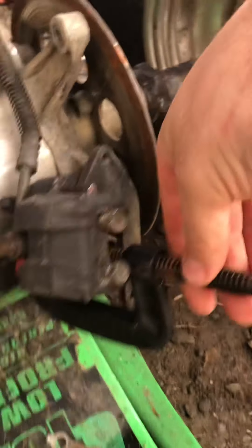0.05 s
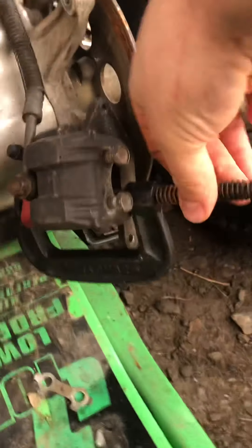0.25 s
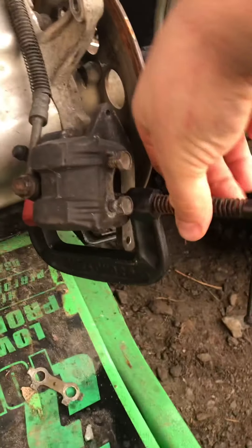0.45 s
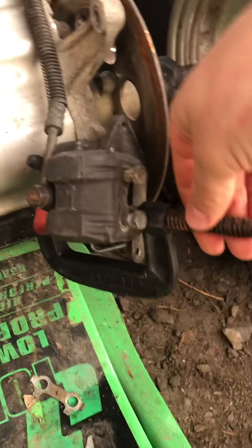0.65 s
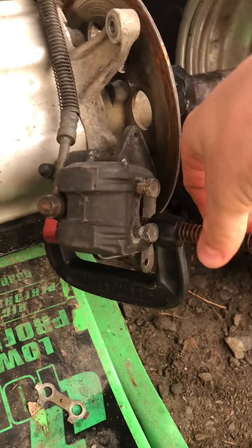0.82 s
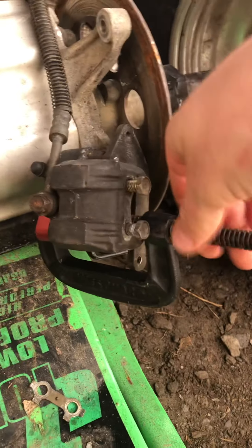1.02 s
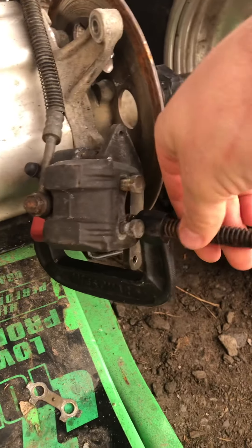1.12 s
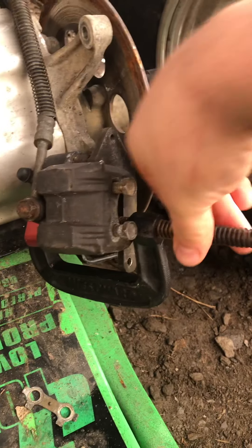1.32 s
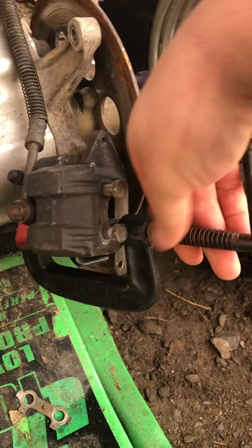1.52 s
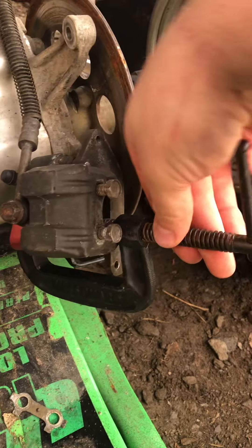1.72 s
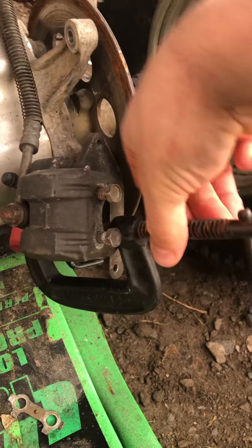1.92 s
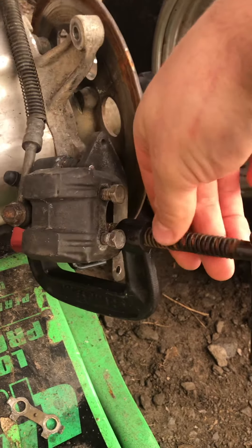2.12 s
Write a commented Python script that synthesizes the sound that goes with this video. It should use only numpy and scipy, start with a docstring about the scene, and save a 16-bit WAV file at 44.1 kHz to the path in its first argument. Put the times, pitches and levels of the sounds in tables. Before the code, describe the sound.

Close up, a metal clamp screw clicks and rubs in short strokes as a hand turns it, with thin high peeps and soft knocks. Late on it gives a brief falling squeak. Quiet outdoor air and a low hum lie behind.

```python
"""Faint rubbing of a steel thread comes first, close to the microphone, over outdoor air and a low hum.
A clamp screw is being turned by hand on a brake caliper. Its loose swivel pad taps, handling gives
dull knocks, and the thread clicks and rubs in short strokes that make the steel sing and peep.
Near the end, stick-slip gives one falling squeak. The wheel arch scatters a little of it all back."""
import sys
import numpy as np
from scipy import signal
from scipy.fft import rfft, irfft
from scipy.io import wavfile
from scipy.ndimage import uniform_filter1d

SR = 44100
rng = np.random.default_rng(int(sys.argv[2]) if len(sys.argv) > 2 else 0)


def wav_record(signal):
    """Record a signal, one row per channel, as 16-bit PCM in the file named by sys.argv[1]."""
    frames = np.transpose(np.atleast_2d(signal))
    bounded = np.clip(frames, -1, 1)
    # unit amplitude maps onto the largest positive 16-bit level
    quanta = np.round(bounded * 32767).astype(np.int16)
    wavfile.write(sys.argv[1], SR, quanta)


N = 94815


def undb(db):
    """Decibels to gain."""
    return 10 ** (np.asarray(db) / 20)


def unit(x):
    """Scale to rms 1."""
    return x / np.sqrt(np.mean(x ** 2))


def noise():
    """White noise, as long as the scene."""
    return rng.standard_normal(N)


def wander(per_s):
    """A random curve of rms 1 that glides to a new value per_s times a second."""
    hold = max(int(SR / per_s), 1)
    steps = np.repeat(noise()[:N // hold + 1], hold)
    return unit(uniform_filter1d(steps, hold)[:N])


def colour(x, points):
    """Shape a spectrum by (Hz, dB) points joined along a log frequency axis."""
    hz, db = np.array(points, float).T
    bins_hz = np.maximum(np.fft.rfftfreq(N, 1 / SR), 1)
    gain = undb(np.interp(np.log(bins_hz), np.log(hz), db))
    return irfft(rfft(x) * gain, N)


def lowpass(x, hz):
    """Second-order low-pass."""
    return signal.sosfilt(signal.butter(2, hz, fs=SR, output="sos"), x)


def noise_band(hz, width):
    """Noise of rms 1, reaching a factor of 1 + width either side of hz."""
    edges_hz = [hz / (1 + width), hz * (1 + width)]
    return unit(signal.sosfilt(signal.butter(2, edges_hz, "band", fs=SR, output="sos"), noise()))


def wavering_tone(hz, spread_hz=27.8, per_s=400):
    """A sine of rms 1 whose pitch wanders around hz."""
    phase = 2 * np.pi * np.cumsum(hz + spread_hz * wander(per_s)) / SR
    return np.sqrt(2) * np.sin(phase)


def fade(t, t60):
    """Exponential decay, 60 dB down after t60 seconds."""
    return np.exp(-np.log(1000) * t / t60)


def swell(t, peak, rise, fall):
    """A stroke that is 20 dB down one rise before and one fall after its peak."""
    from_peak = np.where(t < peak, (peak - t) / rise, (t - peak) / fall)
    return 10 ** -(from_peak ** 1.85)


def add(out, start, x):
    """Mix a sound in at start seconds."""
    i = int(start * SR)
    out[i:] += x[:N - i]


def outdoor_air():
    """The bed of the place: quiet, mostly low air noise and a wavering hum."""
    # Each row: frequency in Hz, relative level of the air noise in dB.
    spectrum = [(28, -32.5), (56, -4), (84, 1), (200, -4), (480, -9), (600, -14), (1070, -20), (1400, -27),
                (3000, -34), (15500, -44.5)]
    air = unit(colour(noise(), spectrum)) * undb(-51.5 + 1.57 * wander(per_s=12.45))
    hum = undb(-58) * wavering_tone(hz=80.05, spread_hz=3.6, per_s=34.25)
    return air + hum


def clamp_ring(t, detune, scatter_db):
    """The steel clamp's answer to one blow; each contact excites its modes a little differently."""
    # Each row: mode frequency in Hz, relative level in dB, time to fall 60 dB in seconds.
    modes = [(2445, -0.5, 0.016), (3780, -3.5, 0.012), (4360, -6, 0.023), (5137, -8, 0.041),
             (6675, -2, 0.019), (7370, -6.5, 0.041), (9440, -6, 0.052), (10580, 0, 0.026), (12490, 7, 0.02),
             (12900, -13, 0.0358)]
    t = t[:N // 8]
    ring = np.zeros(len(t))
    for hz, db, t60 in modes:
        level_draw, pitch_draw, start_cycles = rng.standard_normal(3)
        phase = 2 * np.pi * (hz * (1 + detune * pitch_draw) * t + start_cycles)
        ring += undb(db + scatter_db * level_draw) * fade(t, t60) * np.sin(phase)
    return np.pad(ring, (0, N - len(ring)))


def thread_rubbing(t):
    """Gritty friction in the thread comes in strokes and partly rings the clamp."""
    # Each row: peak time, rise and fall in seconds, level before the low-pass in dB, low-pass in Hz.
    strokes = [(.03, 0.38, 0.27, -50.5, 4500), (0.211, .02, .02, -46.5, 2110),
               (0.23, 0.05, 0.062, -45, 8500), (0.329, 0.03, 0.07, -49, 7300),
               (0.459, .004, 0.026, -46.5, 5620), (.579, 0.0034, 0.051, -47.5, 5230),
               (0.689, 0.032, 0.011, -47.5, 2630), (.783, 0.075, 0.032, -42.5, 12200),
               (0.837, 0.012, 0.056, -49.5, 4430), (1.177, 0.044, 0.036, -47.5, 8800),
               (1.324, 0.085, 0.028, -53, 10200), (1.365, 0.023, 0.014, -51, 12700),
               (1.48, 0.018, 0.03, -52.5, 3560), (1.778, 0.12, 0.1, -43, 5900),
               (1.832, 0.036, 0.038, -41.5, 3000), (1.895, 0.021, 0.033, -45.5, 6900)]
    # Each row: frequency in Hz, relative level of the friction noise in dB.
    spectrum = [(60, -10), (800, 5.5), (2400, -1), (3500, -4), (6800, -3.5), (8300, -8.5), (12500, -6),
                (16000, 3.5)]
    grain_db, ring_db = 2.8, -9
    grit = noise() * undb(grain_db * wander(per_s=700))
    ring = signal.fftconvolve(grit, clamp_ring(t, detune=0.0007, scatter_db=-2.5))[:N]
    rub = unit(colour(grit, spectrum)) + undb(ring_db) * unit(ring)
    return sum(undb(db) * swell(t, peak, rise, fall) * lowpass(rub, hz)
               for peak, rise, fall, db, hz in strokes)


def pad_taps(t):
    """The loose swivel pad snaps against the caliper: well-damped modes with a little dry rattle."""
    # Each row: start in seconds, gain of the tap in dB.
    taps = [(0.068, -35.5), (0.4064, -48), (0.459, -50.5), (1.326, -47.5), (1.371, -51.5), (1.705, -27),
            (1.7811, -34), (1.829, -41.5)]
    # Each row: frequency of a pad mode in Hz, relative level in dB.
    modes = [(1100, -12), (1800, -7.5), (2380, -3.5), (2790, -2.5), (3650, -16), (4700, -14)]
    out = np.zeros(N)
    for start, db in taps:
        ring = np.zeros(N)
        for hz, mode_db in modes:
            struck_hz = hz * (1 + 0.036 * rng.standard_normal())
            ring += undb(mode_db) * np.sin(2 * np.pi * struck_hz * t)
        rattle = undb(-4) * noise_band(hz=2580, width=0.59)
        add(out, start, undb(db) * (ring + rattle) * fade(t, t60=0.028))
    return lowpass(out, hz=6660)


def handling_knocks(t):
    """Soft blows from handling: a short hollow ring speaks first, then a low thud swells under it."""
    # Each row: start in seconds, gain in dB, thud pitch in Hz, upper ring against the thud in dB.
    knocks = [(.165, -33, 377, -10.5), (.351, -45, 460, 7), (0.489, -43.5, 480, -3), (.577, -37, 240, -8.5),
              (0.585, -35.5, 146, -42), (0.930, -51.5, 394, 4), (1.035, -33, 451, -2.5),
              (1.114, -47, 450, 0.5), (1.224, -43.5, 471, -14), (1.533, -35.5, 325, -15.5),
              (1.547, -39.5, 423, -7), (1.811, -37, 402, -16), (1.919, -38, 417, -10),
              (2.014, -36.5, 434, -12), (2.035, -38.5, 370, -20)]
    attack_s = 0.0061

    def resonance(hz, rise_s, t60):
        """A tone wrapped in noise that rises quickly and dies away."""
        body = np.sin(2 * np.pi * hz * t) + undb(-4) * noise_band(hz, width=0.4)
        return body * np.minimum(t / rise_s, 1) * fade(t, t60)

    out = np.zeros(N)
    for start, db, thud_hz, upper_db in knocks:
        thud = resonance(thud_hz, attack_s, t60=0.082)
        upper_hz = 1084 * (1 + 0.049 * rng.standard_normal())
        upper = undb(upper_db) * resonance(upper_hz, attack_s / 2, t60=0.041)
        add(out, start, undb(db) * (thud + upper))
    return out


def steel_singing(t):
    """Friction feeds four steel modes, which swell into thin, raspy, fluttering tones."""
    # Each entry: frequency of a singing mode of the screw in Hz.
    modes_hz = [5130, 6330, 7470, 9410]
    # Each row: peak time and half length in seconds, then the level of each mode in dB.
    swells = [(0.225, 0.034, -51.5, -71, -62, -56.5), (.688, 0.0093, -54, -70, -73, -72),
              (.755, 0.083, -60, -76, -78, -73), (0.79, 0.013, -34.5, -44, -48, -42),
              (1.184, 0.038, -55.5, -76, -61, -71), (1.313, 0.027, -55.5, -77, -75, -79),
              (1.76, 0.021, -58, -64, -54.5, -75), (1.792, 0.026, -54.5, -50, -52.5, -69)]
    rasp_db, flutter_db = -7, 3
    out = np.zeros(N)
    for k, hz in enumerate(modes_hz):
        strength = sum(undb(dbs[k]) * swell(t, peak, half, half) for peak, half, *dbs in swells)
        tone = wavering_tone(hz)
        rasp = undb(rasp_db) * noise_band(hz, width=0.02)
        flutter = undb(flutter_db * wander(per_s=340))
        out += strength * flutter * (tone + rasp)
    return out


def thread_clicks(t):
    """The loose thread slips and strikes: a crack and a short ring, duller for soft contacts."""
    # Each row: start in seconds, gain in dB, low-pass in Hz, relative level of the crack in dB.
    clicks = [(0.2298, -15, 15600, -1.5), (0.2334, -16.5, 12900, -3), (0.2606, -30.5, 5400, 0.5),
              (0.3251, -31, 6940, -9), (0.3532, -18.5, 6200, 0.5), (.577, -46, 9100, 0),
              (0.7179, -24, 5800, -13.5), (0.7794, -26.5, 15900, -2.5), (0.7836, -21.5, 16000, 0.5),
              (.790, -26.5, 13100, -1), (1.1905, -30, 3970, 3), (1.744, -24, 5000, -4.5),
              (1.7703, -32.5, 9500, 0)]
    # Each row: frequency in Hz, relative level of the crack's noise in dB.
    spectrum = [(60, -17), (700, -4.5), (2500, -10), (5000, 6), (8300, -1.5), (12000, 4), (16000, 6)]
    out = np.zeros(N)
    for start, db, cutoff_hz, crack_db in clicks:
        crack = undb(crack_db) * unit(colour(noise(), spectrum)) * fade(t, t60=0.016)
        ring = undb(-11) * clamp_ring(t, detune=0.007, scatter_db=1.5)
        add(out, start, undb(db) * lowpass(crack + ring, cutoff_hz))
    return out


def screw_peeps(t):
    """Faint, brief high tones as the screw comes to rest or starts to move again."""
    # Each row: peak time and half length in seconds, pitch in Hz, level in dB.
    peeps = [(0.829, 0.054, 6610, -63), (2.135, 0.0085, 3714, -62), (2.134, .016, 8970, -64),
             (2.134, 0.013, 11560, -62.5)]
    return sum(undb(db) * wavering_tone(hz) * swell(t, peak, half, half) for peak, half, hz, db in peeps)


def screw_squeak(t):
    """Rough stick-slip that falls in pitch as the screw slows; the octave takes over."""
    # Each row: time in seconds, pitch in Hz, level of the fundamental in dB, level of the octave in dB.
    glide = [(1.738, 1900, -55, -75), (1.744, 1834, -35, -60), (1.751, 1610, -40.5, -46),
             (1.766, 1520, -46, -58), (1.78, 1373, -51, -42), (1.791, 1244, -66, -50.5),
             (1.806, 1240, -69, -47), (1.813, 1160, -65, -72)]
    times, hz, fundamental_db, octave_db = np.array(glide).T
    pitch_hz = np.interp(t, times, hz) * (1 + 0.03 * wander(per_s=700))
    phase = 2 * np.pi * np.cumsum(pitch_hz) / SR
    fundamental_gain = undb(np.interp(t, times, fundamental_db) + 2 * wander(per_s=300))
    octave_gain = undb(np.interp(t, times, octave_db) + 2 * wander(per_s=300))
    overtones = np.sin(2 * phase) + undb(-8) * (np.sin(3 * phase) + np.sin(4 * phase))
    sounding = (t > times[0]) & (t < times[-1])
    return np.sqrt(2) * (fundamental_gain * np.sin(phase) + octave_gain * overtones) * sounding


def wheel_arch_echo(t, direct):
    """The nearby wheel arch scatters a faint, short tail back to the microphone."""
    onset = np.minimum(t / 0.0008, 1)
    scatter = lowpass(noise(), hz=14400) * fade(t, t60=0.22) * onset
    return undb(-21.5) * signal.fftconvolve(direct, scatter / np.linalg.norm(scatter))[:N]


def scene():
    """One microphone outdoors: the clamp close up, the wheel arch behind it, quiet air all round."""
    t = np.arange(N) / SR
    close = thread_clicks(t) + pad_taps(t) + thread_rubbing(t) + steel_singing(t)
    close += screw_squeak(t) + screw_peeps(t) + handling_knocks(t)
    return (close + wheel_arch_echo(t, close) + outdoor_air())[None]


def record(dry):
    """The recorder cuts the top treble steeply."""
    top_hz = 15900
    return signal.sosfilt(signal.ellip(10, 0.2, 70, top_hz, fs=SR, output="sos"), dry)


dry = scene()
out = record(dry)
wav_record(out)
```